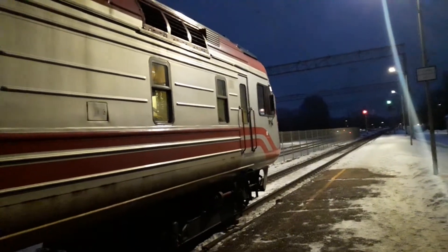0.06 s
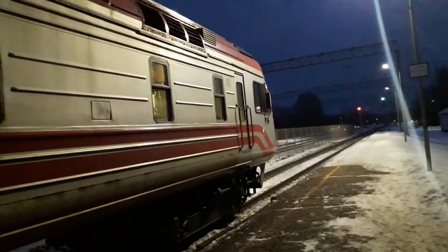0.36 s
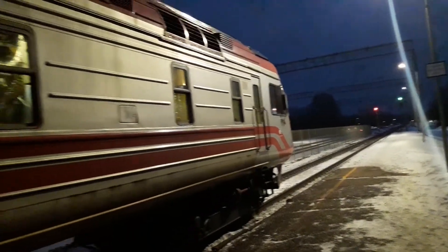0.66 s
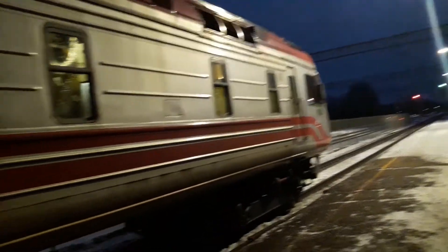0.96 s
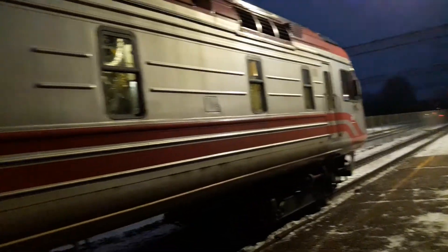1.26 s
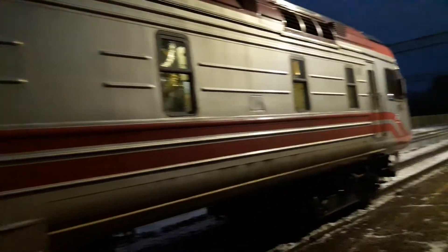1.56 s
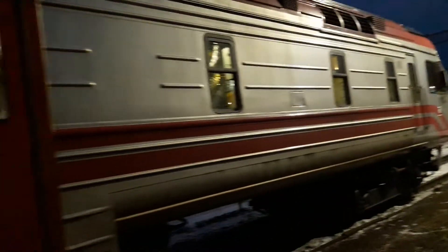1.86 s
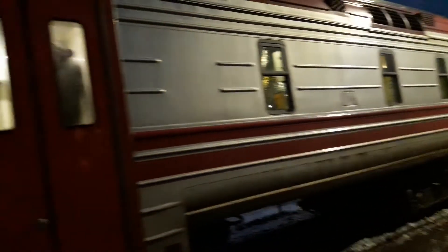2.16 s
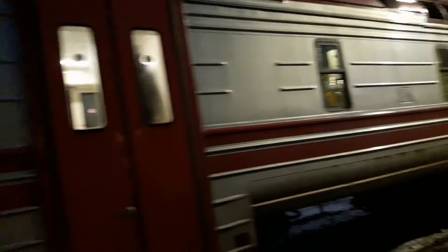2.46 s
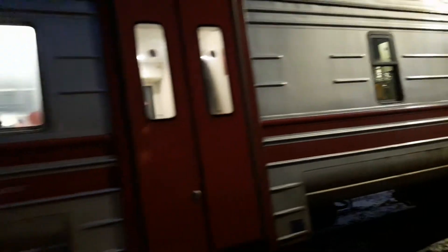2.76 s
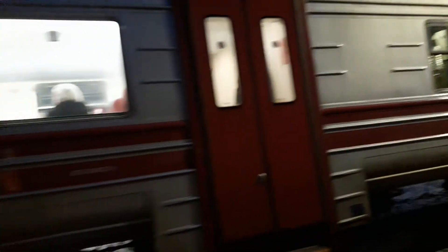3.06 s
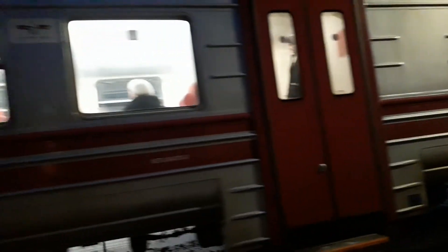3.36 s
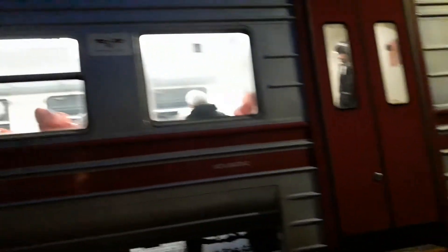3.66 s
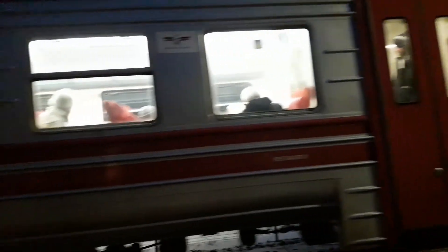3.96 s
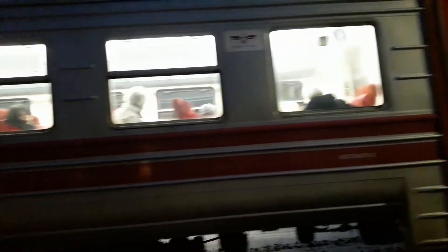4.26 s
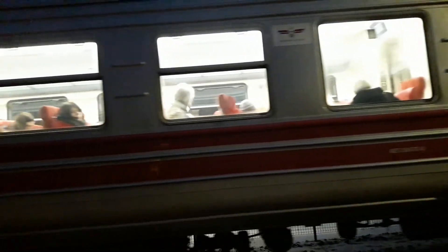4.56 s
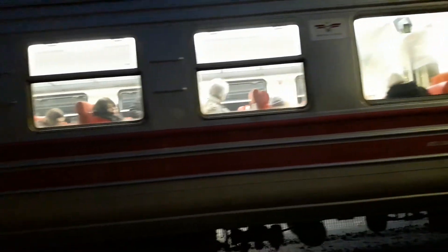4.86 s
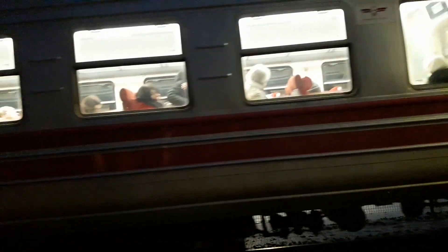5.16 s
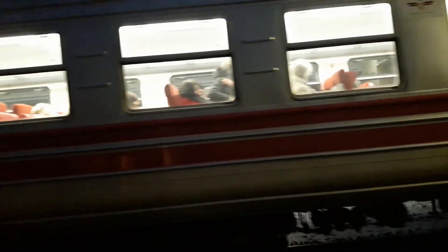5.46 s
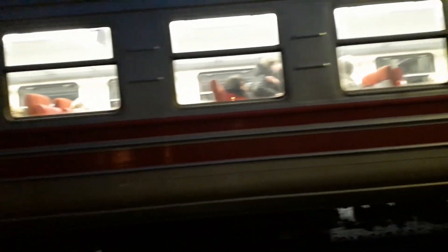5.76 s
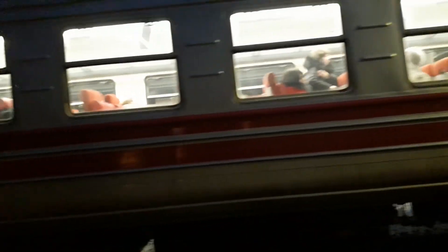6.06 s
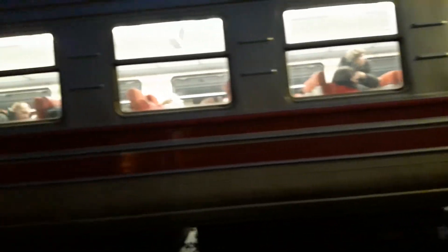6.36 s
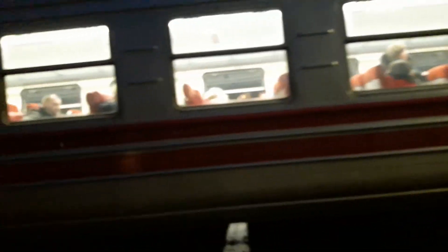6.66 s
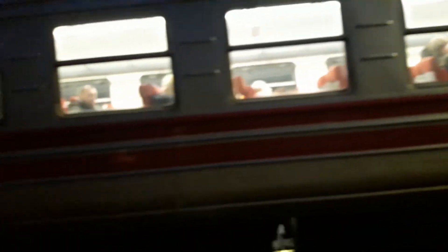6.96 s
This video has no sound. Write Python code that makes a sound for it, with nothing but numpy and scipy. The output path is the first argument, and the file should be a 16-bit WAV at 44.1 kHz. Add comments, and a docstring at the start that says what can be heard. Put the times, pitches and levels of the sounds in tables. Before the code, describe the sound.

A diesel passenger train rolls slowly past, heard from one fixed microphone on the platform near the track. A low, throbbing engine drone runs throughout as the main sound, dipping around 2.4 seconds, swelling again around 4, and dipping near 5.8. Fans and wheels rumble, roar and grind, strongest around 1 second, with a soft air hiss peaking near 2. Thin, wavering wheel and brake squeals come and go over the first 3 seconds. The roar then eases as the coaches follow, with faint high rubs around 4 to 5 seconds. Light metallic ticks start at about 4.6 seconds and grow more frequent near 6. Short brake scrapes fall between 5.5 and 6 seconds, as a set of wheels rumbles by. At 6.4 seconds a coupling gives one sharp, briefly ringing clank, and a faint squeal carries on with the drone until 7 seconds.

```python
"""On a railway platform, one fixed microphone near the track: a diesel railcar rolls slowly past, its coaches
following. The twelve-cylinder engine drones, fades where its platform echo cancels it, and beats against an
auxiliary machine. Fans and wheels roar and air hisses, loudest with the power car nearest. Fans whine, wheels
and brake shoes sing faintly with friction, and the running gear ticks and clanks as a coach draws level."""
import sys
import numpy as np
from scipy import signal
from scipy.fft import rfft, irfft, next_fast_len
from scipy.io import wavfile

SR = 44100
rng = np.random.default_rng(int(sys.argv[2]) if len(sys.argv) > 2 else 0)


def store_pcm(level_fs):
    """Save levels as 16-bit WAV."""
    pcm = np.round(np.clip(level_fs, -1, 1) * 32767).astype(np.int16)
    wavfile.write(sys.argv[1], SR, np.atleast_2d(pcm).T)


N = 309141
CYLINDERS = 12

# Engine speed. Each row: time in seconds, firings per second.
FIRING_RATE = [(0, 149), (1, 150.4), (1.8, 149.76), (2.5, 150), (3.3, 149.5), (4.8, 149.52), (5.7, 147),
               (7, 149)]
# The roar going by: nearest moment and reach in seconds, power car and coach levels in dB.
ROAR_PASSAGE = (0.72, 2.03, -33.5, -46.5)


def from_db(db):
    """Decibels as an amplitude gain."""
    return np.exp(np.asarray(db) * (np.log(10) / 20))


def rms_one(x):
    """The signal scaled to rms 1."""
    return x / np.sqrt(np.mean(x ** 2) + 1e-20)


def seconds():
    """The time of every sample."""
    return np.arange(N) / SR


def in_time(rows):
    """The columns of a curve table at every sample."""
    times, *columns = np.transpose(rows)
    return [np.interp(seconds(), times, column) for column in columns]


def drift(rate_hz, size=N):
    """A slow random wander of rms about 1."""
    pole = np.exp(-80 * np.pi * rate_hz / SR)
    slow = signal.lfilter([1], [1, -2 * pole, pole * pole], rng.standard_normal(size=N // 40 + 2002))
    slow = rms_one(slow[2000:])
    return np.interp(np.arange(size) / 40, np.arange(len(slow)), slow)


def noise(colour):
    """Noise of rms 1, falling 30 dB an octave beyond the ends of its colour table."""
    size = next_fast_len(N)
    octave = np.log2(np.arange(size // 2 + 1) * SR / size + 1)
    hz, db = np.transpose(colour)
    beyond = np.abs(octave - np.clip(octave, np.log2(hz[0]), np.log2(hz[-1])))
    gain = from_db(np.interp(octave, np.log2(hz), db) - 30 * beyond)
    return rms_one(irfft(rfft(rng.standard_normal(size)) * gain, size)[:N])


def tone(turns):
    """A sine of rms 1 that starts anywhere in its cycle."""
    turns = turns + rng.random()
    return np.sqrt(2) * np.sin(2 * np.pi * (turns % 1))


def passing(nearest_s, reach_s):
    """Gain 1 / distance of a source rolling by: 1 when nearest, half power reach_s either side."""
    return 1 / np.hypot(1, (seconds() - nearest_s) / reach_s)


def train_gain(nearest_s, reach_s, power_car_db, coaches_db):
    """The passing power car and the steady coaches add in power."""
    return np.hypot(from_db(power_car_db) * passing(nearest_s, reach_s), from_db(coaches_db))


def air_hiss():
    """Air hisses along the train; its finest spray comes from the front of the power car."""
    # Noise colours. Each row: frequency in Hz, relative level in dB.
    hiss_colour = [(2700, -2), (3600, 1), (4800, -2), (6200, -0.5), (7100, 2), (7500, -5.5), (8000, -12),
                   (9800, -15), (11200, -11.5), (12500, -14), (15700, -16)]
    spray_colour = [(8500, -6.5), (11500, 2), (15700, -4)]
    hiss_gain = train_gain(nearest_s=2.0, reach_s=1.62, power_car_db=-53, coaches_db=-60.5)
    hiss = hiss_gain * from_db(.5 * drift(20)) * noise(hiss_colour)
    spray = from_db(-67.5) * passing(nearest_s=.3, reach_s=.9) * noise(spray_colour)
    return hiss + spray


def dying(start_s, t60):
    """A rise within a millisecond, then free decay by 60 dB in t60 seconds."""
    age = seconds() - start_s
    return np.clip(age / .001, 0, 1) * from_db(-60 * np.clip(age / t60, 0, 2))


def running_gear():
    """Loose links tick brightly; the coupling cracks and rings in its modes."""
    # Brake rigging ticks; the coupling's clank and rebound. Each row: start in seconds, level in dB.
    link_hits = [(4.604, -61), (5.286, -58), (5.93, -57), (5.98, -56.5), (6.05, -57.5), (6.204, -54),
                 (6.44, -52.5), (6.785, -52.5), (6.98, -59)]
    clanks = [(6.411, -38.5), (6.423, -48)]
    # Noise colours. Each row: frequency in Hz, relative level in dB.
    tick_colour = [(3000, -12), (5000, -1.5), (6300, 4.5), (7300, -2), (8200, -10), (13000, -13),
                   (15700, -17.5)]
    crack_colour = [(1300, -9), (2100, 9), (2800, -10), (4300, -17), (5200, -28)]
    # Coupling modes. Each row: frequency in Hz, dB relative to the clank, seconds to fall 60 dB.
    modes = [(1690, -1, 0.18), (1770, -4, .15), (2120, -4, .12), (2510, -10, .09), (3050, -15, 0.056),
             (3800, -11, 0.065), (4404, -14, .05)]
    ticks = sum(from_db(db) * dying(s, t60=0.2) for s, db in link_hits) * noise(tick_colour)
    crack = sum(from_db(db + 11) * dying(s, t60=0.037) for s, db in clanks) * noise(crack_colour)
    ring = sum(from_db(db + mode_db) * dying(s, t60) * tone(hz * seconds())
               for s, db in clanks for hz, mode_db, t60 in modes)
    return ticks + crack + ring


def wavering_tone(hz, size, wander=.0014):
    """A wavering resonance, unsteady in pitch and strength."""
    spread_hz = hz * wander
    strength = from_db(2.4 * drift(13, size))
    pitch_hz = hz + spread_hz * drift(spread_hz, size)
    return strength * tone(np.cumsum(pitch_hz) / SR)


def scrape(hz, size):
    """Rough friction: noise twice through a broad resonance."""
    resonance = signal.iirpeak(hz, Q=5.8, fs=SR)
    band = signal.lfilter(*resonance, rng.standard_normal(size))
    return rms_one(signal.lfilter(*resonance, band))


def arches(rows, sound):
    """Each event swells and dies in one arch."""
    out = np.zeros(N)
    for start, length, hz, db in rows:
        span = np.arange(max(int(start * SR), 0), min(int((start + length) * SR), N))
        arch = np.sin(np.pi * (span / SR - start) / length)
        out[span] += from_db(db) * arch * sound(hz, len(span))
    return out


def whines_and_squeals():
    """Fans whine below 720 Hz; the wheels sing thinly as they pass, and brake shoes squeal or scrape when they
    touch."""
    # Steady tones: a fan's whine and the wheels' singing. Each row: nearest moment and reach in seconds, pitch
    # in Hz, level in dB.
    wheel_tones = [(1.5, 1.2, 426, -47.5), (1.601, 1.5, 1547, -52), (2.5, 1.8, 5809, -72),
                   (5.9, .9, 12822, -82)]
    # Fan whines and smooth squeals, then rough scrapes. Each row: start and length in seconds, pitch in Hz,
    # level in dB.
    squeals = [(-.1, 0.46, 630, -38), (.78, 0.69, 662, -35), (1.1, 1.28, 716, -42.5),
               (2.2, 1.1, 428.5, -43.5), (.5, 0.51, 1536, -41), (2.35, .45, 1535, -44),
               (6.3, 1.2, 1590, -52), (.65, .5, 5810, -64), (1.35, .9, 5810, -66), (3.98, .3, 5810, -65),
               (5.15, .28, 12822, -77), (5.55, .13, 12822, -78)]
    scrapes = [(3.62, 0.28, 5810, -61), (4.72, 0.15, 5400, -59), (5.56, .07, 1750, -40),
               (5.63, 0.18, 1954, -41), (5.87, 0.067, 805, -39), (5.88, 0.1, 1520, -38.5),
               (5.95, 0.12, 670, -41)]
    singing = sum(from_db(db) * passing(s, reach_s) * wavering_tone(hz, N)
                  for s, reach_s, hz, db in wheel_tones)
    return singing + arches(squeals, wavering_tone) + arches(scrapes, scrape)


def engine_noise(colour, cycles, locked):
    """Noise of which a part repeats every engine cycle, as the same parts knock in the same order."""
    hz, db = np.transpose(colour)
    multiples_hz = np.arange(512) * cycles[-1] * SR / N
    in_band = (multiples_hz > 2 * FIRING_RATE[0][1]) & (multiples_hz < hz[-1])
    strengths = from_db(np.interp(multiples_hz, hz, db)) * in_band
    scatter = [1, 1j] @ rng.standard_normal((2, len(strengths)))
    one_cycle = rms_one(irfft(strengths * scatter, 8192))
    repeating = np.interp(cycles % 1, np.arange(len(one_cycle)) / len(one_cycle), one_cycle, period=1)
    return noise(colour) + locked * repeating


def rolling(cycles):
    """Fans and wheels rumble, roar and grind; the engine's clatter pulses lightly in the grind."""
    # Noise colours. Each row: frequency in Hz, relative level in dB.
    rumble_colour = [(25, -24), (45, -10), (70, -3), (110, -4.5), (170, 2.5), (250, 5.5), (310, 0),
                     (420, 1), (540, -4.5), (700, -28.5)]
    roar_colour = [(400, -19), (560, -4.5), (640, 1.5), (720, -1.5), (810, 0.5), (860, -4), (980, -3),
                   (1080, -2), (1160, -4), (1280, -8.5), (1600, -19.5)]
    grind_colour = [(1000, -23.5), (1350, -2), (1550, -0.5), (1950, -1.3), (2300, -5.5), (2700, -11.5),
                    (3100, -16.5), (3800, -19.5), (4500, -24), (5500, -34.5)]
    clatter = 1 + .05 * tone(15 * cycles)
    bogie = passing(nearest_s=5.93, reach_s=0.11)  # a coach's bogie goes by the microphone
    rumble_gain = train_gain(nearest_s=1.1, reach_s=2, power_car_db=-35.5, coaches_db=-39.5)
    rumble_gain = np.hypot(rumble_gain, from_db(-36) * bogie)
    roar_gain = np.hypot(train_gain(*ROAR_PASSAGE), from_db(-44) * bogie)
    grind_gain = train_gain(nearest_s=1.13, reach_s=1.47, power_car_db=-34, coaches_db=-45)
    rumble = rumble_gain * engine_noise(rumble_colour, cycles, locked=0.39)
    roar = roar_gain * from_db(.55 * drift(24)) * engine_noise(roar_colour, cycles, locked=0.46)
    grind = grind_gain * from_db(.5 * drift(25)) * noise(grind_colour) * clatter
    return rumble + roar + grind


def machine_lines(turns, lines, flutter):
    """Whole multiples of a machine's cycle rate, each unsteady in strength and phase."""
    out = np.zeros(N)
    for multiple, db in lines:
        strength = from_db(db) * (1 + flutter * drift(1.9))
        out += strength * tone(multiple * turns + flutter * drift(4.1) / (2 * np.pi))
    return out


def auxiliary():
    """A second machine beats against the engine, sagging in speed as it draws away."""
    # Its run. Each row: time in seconds, strokes per second, gain in dB.
    run = [(0, 44.86, 3.5), (1.5, 45.14, 1), (3.1, 44.86, 1.5), (3.9, 42.93, -0.5), (5.2, 43.2, -10.5),
           (7.01, 43.22, -14.5)]
    # Its tones. Each row: multiple of the shaft rate, relative level in dB.
    lines = [(6, -46), (8, -61.5), (9, -57.5), (12, -52.5), (14, -51), (16, -49.5), (17, -45), (18, -45),
             (22, -40.5), (24, -34.5), (27, -56), (31, -52.5), (36, -51), (47, -54)]
    stroke_hz, gain_db = in_time(run)
    turns = np.cumsum(stroke_hz) / SR / 6  # six strokes a turn
    return from_db(gain_db) * machine_lines(turns, lines, flutter=.2)


def diesel(cycles):
    """Each bank of six fires in turn; the drone fades against its echo; unequal cylinders throb."""
    # The platform echo cancels the drone. Each row: centre and half width in seconds, depth in dB.
    echo_fades = [(2.42, 1.07, 14), (5.76, 0.83, 10)]
    # One bank's tone and its third harmonic. Each row: time in seconds, level in dB.
    bank_levels = [(0, -44.5), (.9, -45.5), (1.5, -54.5), (2.1, -48), (3, -38.5), (4.7, -33), (7.01, -36.5)]
    third_levels = [(0, -44), (2.2, -42), (2.8, -32), (3.7, -41.5), (4.25, -32.5), (5.9, -37.5), (6.4, -46)]
    # Tones of unequal cylinders. Each row: multiple of the engine cycle rate, relative level in dB.
    uneven_lines = [(5, -56.5), (7, -48.5), (8, -46), (9, -45), (10, -44), (11, -46), (13, -54),
                    (14, -38.5), (15, -43.5), (16, -43.5), (17, -54), (19, -49.5), (20, -47), (21, -45),
                    (22, -47.5), (24, -54), (26, -50.5), (27, -54.5), (30, -54.5), (38, -51.5), (45, -57),
                    (46, -64), (58, -50.5), (63, -49.5), (66, -55)]
    firings = CYLINDERS * cycles
    drone = from_db(-15) * passing(nearest_s=1.82, reach_s=2.41) * tone(firings)
    for s, width_s, depth_db in echo_fades:
        lost_power = (1 - from_db(-depth_db) ** 2) * passing(s, width_s) ** 2
        drone *= np.sqrt(1 - lost_power)
    bank = from_db(in_time(bank_levels)[0]) * tone(firings / 2)
    third = from_db(in_time(third_levels)[0]) * tone(3 * firings / 2)
    roar_gain = train_gain(*ROAR_PASSAGE)
    throb_gain = (from_db(3.5) * roar_gain / roar_gain.max()) ** 0.65  # recedes with the roar
    throb = throb_gain * machine_lines(cycles, uneven_lines, flutter=0.22)
    return drone + bank + third + throb


def scene():
    """The whole train in mono, heard from the platform."""
    cycles = np.cumsum(in_time(FIRING_RATE)[0]) / SR / CYLINDERS
    machines = diesel(cycles) + auxiliary()
    return (machines + rolling(cycles) + air_hiss() + whines_and_squeals() + running_gear())[None]


def record(dry):
    """The sound begins and ends without a click; the top is cut steeply above 15720 Hz."""
    t = seconds()
    edges = np.clip(np.minimum(t, t[-1] - t) / .003, 0, 1)
    lowpass = signal.ellip(12, .1, 80, 15720, fs=SR, output="sos")
    return signal.sosfilt(lowpass, dry * edges)


dry = scene()
out = record(dry)
store_pcm(out)
```